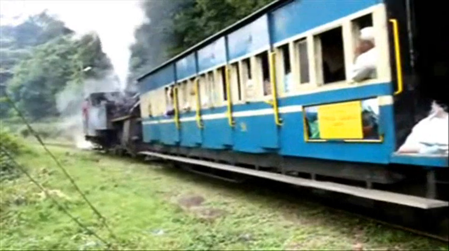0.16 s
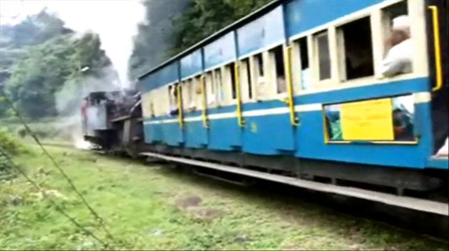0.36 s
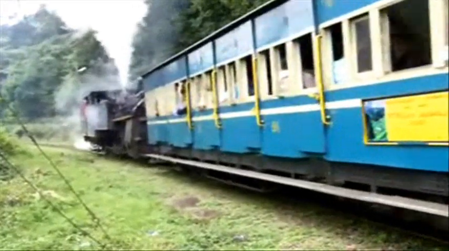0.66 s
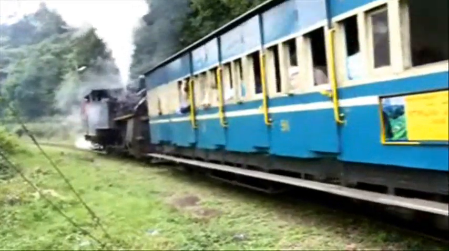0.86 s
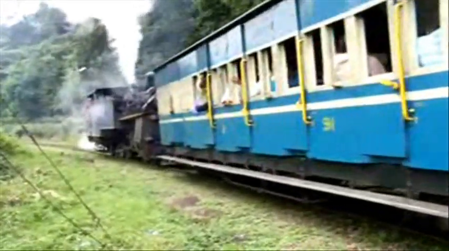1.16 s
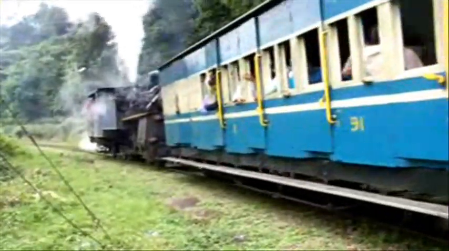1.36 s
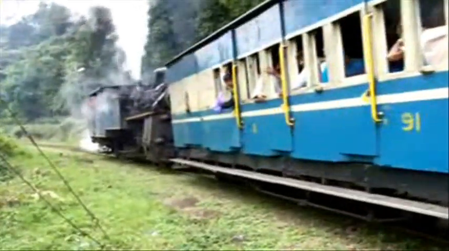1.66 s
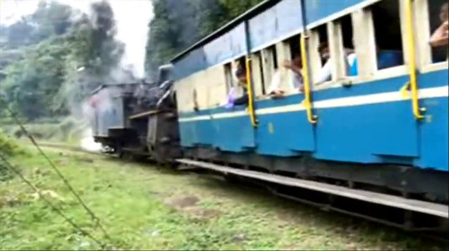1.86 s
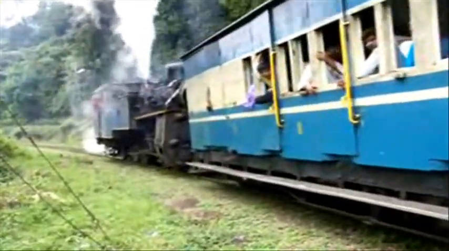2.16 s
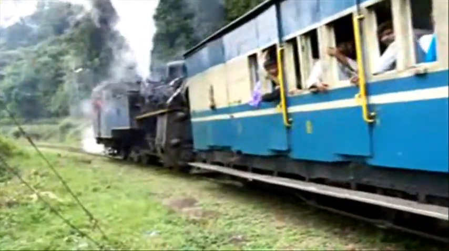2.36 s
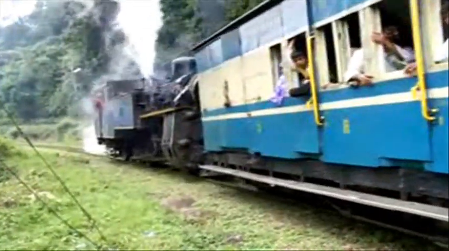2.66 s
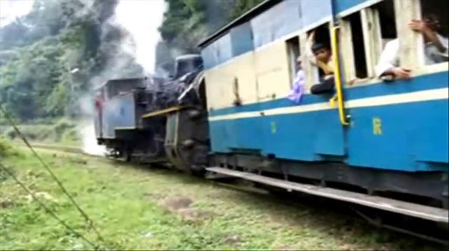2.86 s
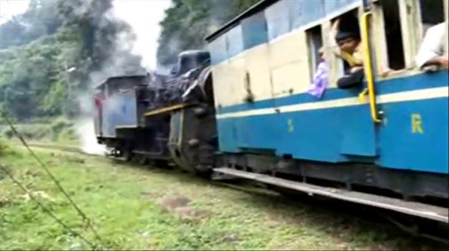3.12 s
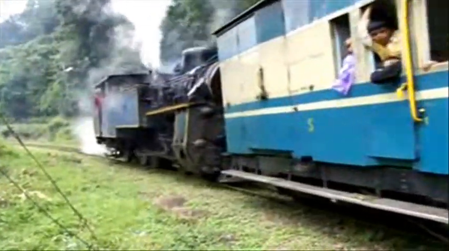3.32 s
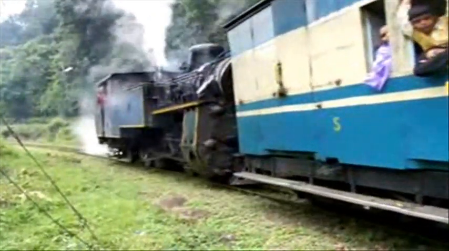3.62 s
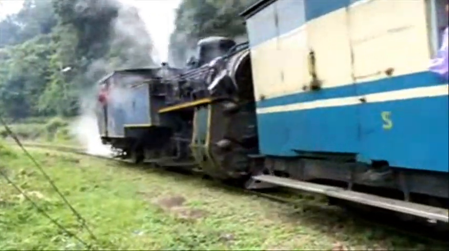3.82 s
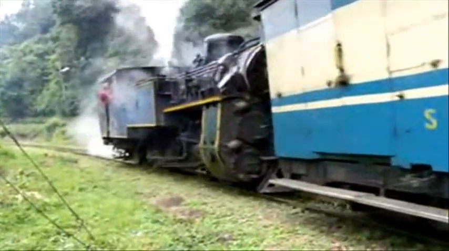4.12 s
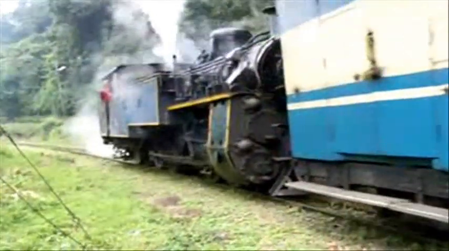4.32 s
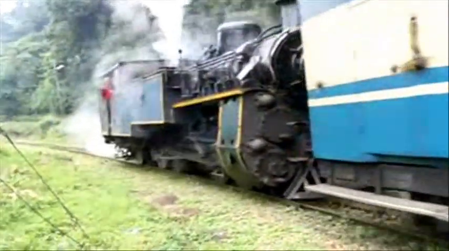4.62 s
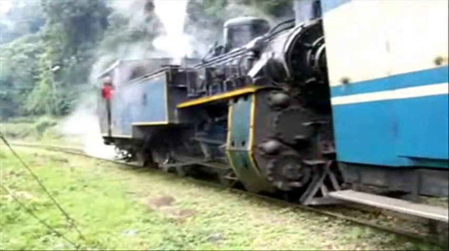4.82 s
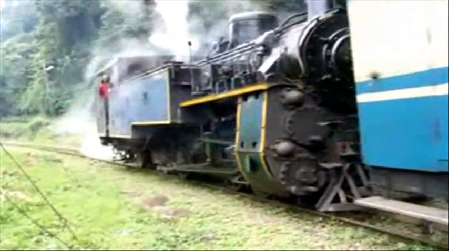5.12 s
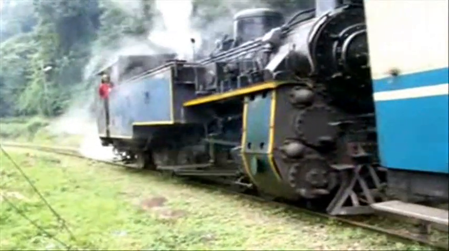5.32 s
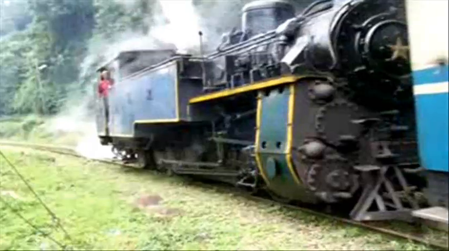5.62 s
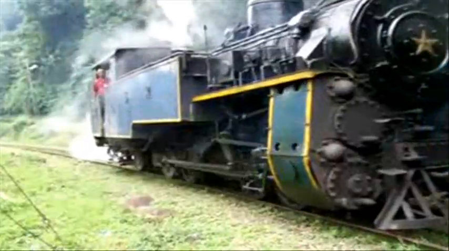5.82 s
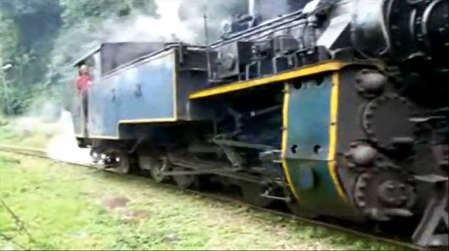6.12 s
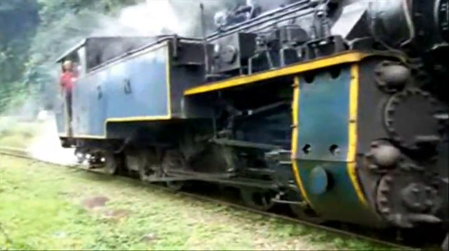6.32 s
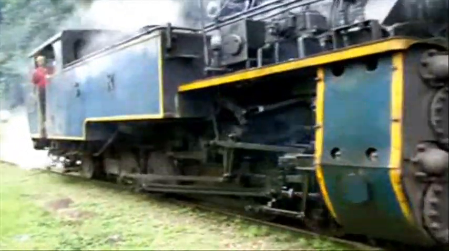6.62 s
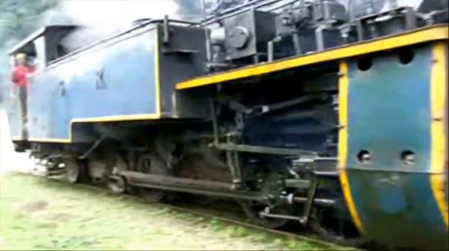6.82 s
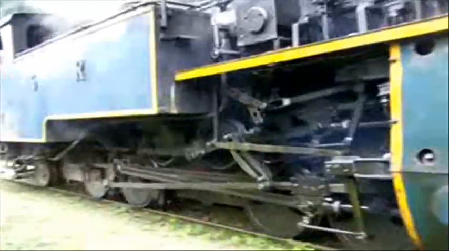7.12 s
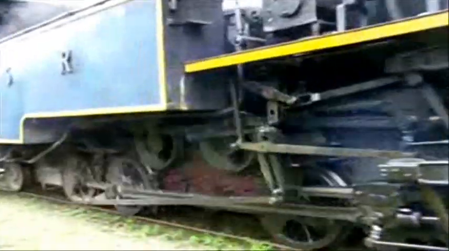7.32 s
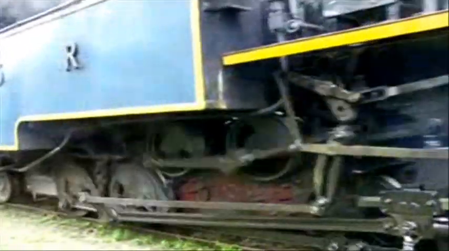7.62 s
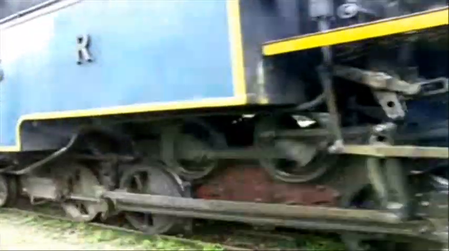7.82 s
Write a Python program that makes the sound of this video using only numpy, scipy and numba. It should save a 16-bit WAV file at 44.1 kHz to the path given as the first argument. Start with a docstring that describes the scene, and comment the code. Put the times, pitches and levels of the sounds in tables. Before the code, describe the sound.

Close, mono and rough: a working steam engine already chuffing fast from the start, growing harder and louder from about two to four seconds, then easing into softer, shorter puffs. Rod knocks clatter on the stronger beats, with fleeting tonal pings inside the noise. Continuous breathy steam hiss and a low throbbing rumble of wheels and frames fill the gaps. Open air, little echo, muffled extreme highs.

```python
"""A steam locomotive works slowly uphill past one microphone standing beside the track.
Its exhaust leads: four uneven beats a wheel turn, noise puffs ringing the chimney's air column under a jet hiss.
Rods knock as short rattles, brief tonal peaks colour the noise; leaking steam flutters as filtered noise.
Wheels and frames rumble low down, throbbing with the beats.
The mono microphone is dull on top; its preamp rounds the peaks and its output is limited at full scale."""
import sys
import numpy as np
from scipy import signal
from scipy.fft import rfft, irfft, next_fast_len
from scipy.io import wavfile
from scipy.ndimage import uniform_filter1d
from numba import njit

SR = 44100
rng = np.random.default_rng(int(sys.argv[2]) if len(sys.argv) > 2 else 0)


def store_wav(level_fs):
    """Save 16-bit WAV to argv[1]."""
    pcm = np.round(np.clip(np.atleast_2d(level_fs), -1, 1) * 32767)
    wavfile.write(sys.argv[1], SR, pcm.T.astype(np.int16))


N = 351477  # samples

# Exhaust beats, going round the four strokes:
# [peak t/s, blast level/dB, chimney ring level/dB, jet hiss level/dB, length as a ratio to its stroke]
EXHAUST_BEATS = [(0.042, -18, -22.5, -12, .9), (0.175, -22, -33, -13.5, .6), (0.356, -19, -26, -10.5, .8),
                 (0.485, -22, -25, -17.5, 0.98), (0.594, -17, -23, -11, 1.2), (0.744, -22, -24.5, -18, .9),
                 (0.907, -16.5, -22.5, -8, 1.05), (1.065, -20.5, -22.5, -14, 1),
                 (1.148, -15.5, -21.4, -8.5, 1.3), (1.286, -19.5, -19.5, -13, .7),
                 (1.463, -15.5, -23.5, -8.5, 1.05), (1.618, -17.5, -23, -12.5, 1.1),
                 (1.694, -11, -18, -7.5, 1.27), (1.854, -19, -23, -16.3, 1.2),
                 (2.017, -12.5, -20.5, -7.5, 0.92), (2.19, -16.5, -25.5, -12.5, .9),
                 (2.259, -13.5, -18.5, -8, 1.1), (2.414, -18, -18, -18, .85), (2.577, -14.5, -26, -8, 1.1),
                 (2.743, -18.5, -23, -14, .8), (2.816, -13, -20, -8.5, 1.15), (2.974, -17.5, -25, -16, .9),
                 (3.143, -15.5, -20.1, -9, 1.05), (3.306, -18.5, -23, -14, .9),
                 (3.385, -12.6, -17, -10.5, .85), (3.512, -23, -24, -17, 1.1),
                 (3.701, -12.5, -17.5, -12, 0.9), (3.859, -19, -23, -19.5, 1.1),
                 (3.937, -23, -23.2, -13, .6), (4.086, -18.5, -24, -20, .95),
                 (4.252, -19.5, -28, -15, 1.35), (4.43, -23, -21, -20, .5), (4.504, -15, -22, -15, 0.74),
                 (4.655, -23, -25, -17.5, 2), (4.816, -19, -20.3, -17.5, 0.86), (5.0, -22, -24, -16, .8),
                 (5.07, -15, -23, -17, 0.53), (5.22, -24.5, -23.5, -17.5, 1.3),
                 (5.385, -20.5, -29, -17, 1.2), (5.551, -23, -24, -16, .8), (5.626, -19.3, -21.5, -17, .65),
                 (5.78, -23.5, -29, -17, 1.8), (5.936, -17.5, -22, -20, .7), (6.107, -21, -25.5, -18, .95),
                 (6.18, -20.7, -21.5, -18, 1.1), (6.34, -26, -25.5, -17, 1.4),
                 (6.503, -19, -23.5, -15.5, .5), (6.675, -24.5, -28, -17.5, 1.2),
                 (6.75, -20, -22, -22, .55), (6.89, -25, -29, -19, 1.3), (7.063, -16.5, -32, -18, .45),
                 (7.23, -22.5, -26, -16, .7), (7.312, -18, -24, -15, .8), (7.47, -30, -26, -18, 1.4),
                 (7.625, -22.1, -32, -16.5, 0.83), (7.8, -24, -26, -15.5, .9), (7.872, -25, -25, -15, .7)]
# The four strokes of a wheel turn, in order, before stretching:
# [rise t/s, fall t/s, thud in the frames level/dB]
WHEEL_STROKES = [(0.012, 0.035, -1), (0.031, 0.031, -1.5), (0.034, 0.042, 0), (0.035, 0.072, -1)]
# Lowest resonance of the chimney's air column: [f/Hz, width of each pass/Hz, level/dB]
CHIMNEY_MODES = [(563, 100, -5), (525, 314, 4)]
# Upper resonances rung by the blast: [f/Hz, width of each pass/Hz, level/dB]
BLAST_MODES = [(1034, 230, -3.5), (1312, 98, -9.5), (1870, 440, -3.5), (1456, 1650, 10)]
# Spectrum of the jet hiss: [f/Hz, relative level per Hz/dB]
JET_SPECTRUM = [(1290, -36), (2200, -4.5), (3270, 6), (4730, 2.5), (5060, 0.5), (6680, -5.5), (9260, -30),
                (9610, -68), (12500, -70), (21100, -120)]
# Steady steam: [t/s, leak level/dB, draught roar level/dB, narrow hiss level/dB]
STEAM_LEVELS = [(0.0, -15, -22, -24), (1.0, -14.5, -23, -29), (1.99, -15.5, -22.5, -29),
                (2.99, -17.5, -22, -24.5), (3.98, -17.5, -21.5, -22.5), (4.98, -18.5, -21.5, -21.5),
                (5.98, -16, -24.5, -22), (6.97, -15, -25, -23), (7.97, -16, -25.5, -22)]
# Spectrum of the steam leaks: [f/Hz, relative level per Hz/dB]
LEAK_SPECTRUM = [(1060, -25.5), (1800, -10.5), (2670, -5.5), (3550, 0), (4200, -2.5), (6580, -9),
                 (7950, -22), (8710, -24.5), (9610, -39), (12500, -77), (21100, -120)]
# Spectrum of the draught roar: [f/Hz, relative level per Hz/dB]
DRAUGHT_SPECTRUM = [(190, -17), (330, -0.5), (554, -1), (743, -6), (980, -4.5), (1180, -6), (1290, -3.5),
                    (2600, -5.5), (3380, -5.5), (5720, -120)]
# Resonance of the narrow hiss: [f/Hz, width of each pass/Hz, level/dB]
NARROW_HISS_MODES = [(3940, 1100, 0)]
# Wheels and frames: [t/s, boom level/dB, boom centre f/Hz, rolling level/dB]
RUMBLE_COURSE = [(0.0, -27, 222, -35), (0.9, -28, 231, -33), (1.3, -24, 243, -33.5), (2.0, -27, 237, -31.5),
                 (2.9, -25.5, 226, -36.5), (3.7, -27, 222, -32), (4.2, -23.5, 217, -32),
                 (5.2, -23, 228, -32), (6.1, -23.5, 239, -32), (6.8, -28.5, 237, -35.5),
                 (7.97, -30, 230, -34)]
# Spectrum of the rolling: [f/Hz, relative level per Hz/dB]
ROLLING_SPECTRUM = [(15, -44), (28, -16.5), (45, -12), (70, -8), (110, -4), (170, -2), (220, -24.5),
                    (300, -62.5)]
# Hard knocks of the rods, mostly at the start of a beat: [t/s, nominal peak level/dB]
ROD_KNOCKS = [(0.033, -0.5), (0.342, -3), (0.583, -5), (0.889, -1), (1.134, -1), (1.45, -3), (1.685, -3),
              (2.003, 2), (2.179, 1), (2.252, -1), (2.562, 4.5), (2.666, 1), (2.807, 4), (3.123, 2),
              (3.377, 2), (3.685, 0), (3.934, 3), (4.245, 5), (4.42, 0), (4.495, 0), (4.807, 1.5),
              (5.062, 0.5), (5.375, -1), (5.623, -1.5), (5.929, -6), (6.176, -1), (6.496, -6), (7.056, -7)]
# Broad colour of the rod knocks: [f/Hz, width of each pass/Hz, level/dB]
ROD_MODES = [(897, 530, -3.5), (1820, 650, -4.5), (3280, 930, 2), (4800, 330, -7.5)]
# Brief tonal peaks in the noise of the beats: [t/s, f/Hz, peak level/dB]
TONAL_PEAKS = [(1.14, 1335, -10), (1.283, 1620, -17), (1.477, 1765, -16), (1.699, 556, -15),
               (2.009, 1141, -14), (2.257, 3187, -14), (2.571, 991, -16), (2.576, 4660, -13),
               (2.806, 1335, -14), (2.729, 711, -15), (2.813, 539, -12.5), (2.962, 581, -11),
               (3.13, 1340, -14), (3.142, 4694, -17), (3.15, 3338, -10), (3.386, 4920, -12),
               (3.388, 772, -16), (3.511, 629, -14.5), (3.687, 1077, -14), (3.691, 494, -16),
               (3.696, 4800, -3.5), (3.859, 1055, -18), (4.249, 861, -16), (4.494, 2455, -16),
               (4.644, 559, -12.5), (4.818, 517, -16), (5.066, 1723, -19), (5.38, 1910, -16),
               (6.619, 3620, -11)]

FRAME_WIDTH_HZ = 103  # of each pass
KNOCK_T60_S, KNOCK_ATTACK_S = 0.076, 0.00092
TONE_S = 0.0094  # time scale of a tonal peak's swell
PREAMP_HEADROOM, FULL_SCALE = 1.36, 1.0  # amplitudes
MIC_HZ, TOP_HZ = 9650, 15900  # low-pass edges before and after the clipping


def undb(db):
    """Amplitude ratio of a level in dB."""
    return 10 ** (np.asarray(db) / 20)


def unit(x):
    """Scale a signal to an rms level of 1."""
    return x / np.sqrt(np.mean(x ** 2))


def curves(table):
    """Columns of a table, drawn as straight lines between its times."""
    s, *columns = np.transpose(table)
    return [np.interp(np.arange(N) / SR, s, column) for column in columns]


def walk(rate):
    """Random levels held 1 / rate s and smoothed twice over that time; mean 0, spread somewhat below 1."""
    hold = int(SR / rate)
    steps = np.repeat(rng.standard_normal(N // hold + 1), hold)
    return uniform_filter1d(uniform_filter1d(steps, hold), hold)[:N]


@njit
def svf(x, hz, width):
    """State-variable band-pass, gain 1 at the centre, which may move."""
    y, band, low = np.empty(len(x)), 0., 0.
    for i in range(len(x)):
        g, damping = np.tan(np.pi * hz[i] / SR), width / hz[i]
        v = (band + g * (x[i] - low)) / (1 + g * (g + damping))
        band, low, y[i] = 2 * v - band, low + 2 * g * v, damping * v
    return y


def steep(x, hz, width):
    """A resonance applied twice."""
    centre = hz * np.ones(len(x))
    return svf(svf(x, centre, float(width)), centre, float(width))


def ring(x, modes):
    """Several resonances, scaled so that white noise of level 1 comes out at level 1."""
    def through(v):
        return sum(undb(db) * steep(v, hz, width) / np.sqrt(width) for hz, width, db in modes)
    return through(x) / np.std(through(rng.standard_normal(SR)))


def turbulence(points, flicker_db, rate):
    """Third-octave bands of noise under a spectrum, each flickering alone, at rms level 1."""
    hz, db = np.transpose(points)
    size = next_fast_len(N)
    octave = np.log2(np.maximum(np.fft.rfftfreq(size, 1 / SR), 1))
    colour = undb(np.interp(octave, np.log2(hz), db, left=-90, right=-90))
    whole = rfft(rng.standard_normal(size)) * colour
    out = 0
    for centre in np.arange(np.log2(hz[0]), np.log2(hz[-1]) + 1 / 3, 1 / 3):
        # Neighbouring triangular bands cross-fade
        band = irfft(whole * np.clip(1 - 3 * abs(octave - centre), 0, 1), size)[:N]
        out = out + band * undb(flicker_db * walk(rate))
    return unit(out)


def strokes():
    """The stroke that each beat belongs to."""
    return np.array(WHEEL_STROKES)[np.arange(len(EXHAUST_BEATS)) % len(WHEEL_STROKES)]


def puffs(levels_db, stretch):
    """Steam pressure at the nozzle: a flat-topped rise to each beat and an exponential fall."""
    t, power = np.arange(N) / SR, np.zeros(N)
    for (s, *_, length), (rise, fall, _), db in zip(EXHAUST_BEATS, strokes(), levels_db):
        near = slice(max(int((s - .15) * SR), 0), int((s + .5) * SR))
        u = (t[near] - s) / length
        swell = np.exp(-abs(u / rise) ** 3.3)
        decay = np.exp(-u / (fall * stretch))
        power[near] += (undb(db) * np.where(u < 0, swell, decay)) ** 2
    return np.sqrt(power)  # overlapping puffs add in power


def steam():
    """Leaks and draught flutter together as the wind tears the plume."""
    leak_db, draught_db, narrow_db = curves(STEAM_LEVELS)
    flutter_db = 0.7 * walk(25) + 0.5 * walk(6)
    leak = undb(leak_db + flutter_db) * turbulence(LEAK_SPECTRUM, 1.0, 14)
    narrow = undb(narrow_db + flutter_db) * ring(rng.standard_normal(N), NARROW_HISS_MODES)
    draught = undb(draught_db + flutter_db) * turbulence(DRAUGHT_SPECTRUM, 1.9, 12)
    return leak + narrow + draught


def wheels():
    """The wheels' grind and a thud from each beat throb in a wandering resonance of the frames."""
    boom_db, boom_hz, roll_db = curves(RUMBLE_COURSE)
    *_, thud_db = strokes().T
    grind = (undb(0.82 * walk(18)) + puffs(thud_db, 1.2)) * rng.standard_normal(N)
    boom = steep(grind, boom_hz * (1 + 0.04 * walk(9)), FRAME_WIDTH_HZ)
    rolling = undb(roll_db + 1.2 * walk(8.8)) * turbulence(ROLLING_SPECTRUM, .8, 4.7)
    return undb(boom_db) * unit(boom) + rolling


def knocks():
    """Each rod knock is a dense rattle of coloured noise that starts at once and dies fast."""
    force = np.zeros(N)
    for s, db in ROD_KNOCKS:
        start = int(s * SR)
        u = np.arange(min(4000, N - start)) / SR
        attack = 1 - np.exp(-u / KNOCK_ATTACK_S)
        force[start:start + len(u)] += undb(db - 60 * u / KNOCK_T60_S) * attack
    return ring(force * rng.standard_normal(N), ROD_MODES) / 3  # noise peaks near three times its rms


def exhaust():
    """Each beat is lumpy noise that rings the chimney, with the hiss of the jet on top."""
    _, blast_db, ring_db, jet_db, _ = np.transpose(EXHAUST_BEATS)
    lumps = undb(1.7 * walk(90))
    low = ring(puffs(ring_db, 0.89) * lumps * rng.standard_normal(N), CHIMNEY_MODES)
    mid = ring(puffs(blast_db, 1.0) * lumps * rng.standard_normal(N), BLAST_MODES)
    jet = puffs(jet_db, 1.14) * lumps * turbulence(JET_SPECTRUM, 1.0, 30)
    return low + mid + jet


def tonal_peaks():
    """Brief sines of wavering pitch, fast to start and slower to die, colour the noise of the beats."""
    out, waver = np.zeros(N), 1 + 0.0066 * walk(120)
    for s, hz, db in TONAL_PEAKS:
        near = slice(int((s - .06) * SR), int((s + .12) * SR))
        u = (np.arange(near.start, near.stop) / SR - s) / TONE_S
        swell = np.exp(-np.where(u < 0, 1.7 * u ** 2, 0.7 * u ** 2 / (1 + abs(u) / 2)))
        cycles = hz * np.cumsum(waver[near]) / SR + rng.random()
        out[near] += undb(db) * swell * np.sin(2 * np.pi * cycles)
    return out


def scene():
    """One microphone beside the track feeds both channels."""
    mono = steam() + wheels() + knocks() + exhaust() + tonal_peaks()
    return np.array([mono, mono])


def record(dry):
    """The preamp rounds the peaks, the dulled signal is clipped at full scale and the top is cut."""
    rounded = PREAMP_HEADROOM * np.tanh(dry / PREAMP_HEADROOM)
    dull = signal.sosfilt(signal.ellip(10, .2, 80, MIC_HZ, fs=SR, output="sos"), rounded)
    clipped = np.clip(dull, -FULL_SCALE, FULL_SCALE)
    return signal.sosfilt(signal.ellip(8, .2, 70, TOP_HZ, fs=SR, output="sos"), clipped)


dry = scene()
out = record(dry)
store_wav(out)
```